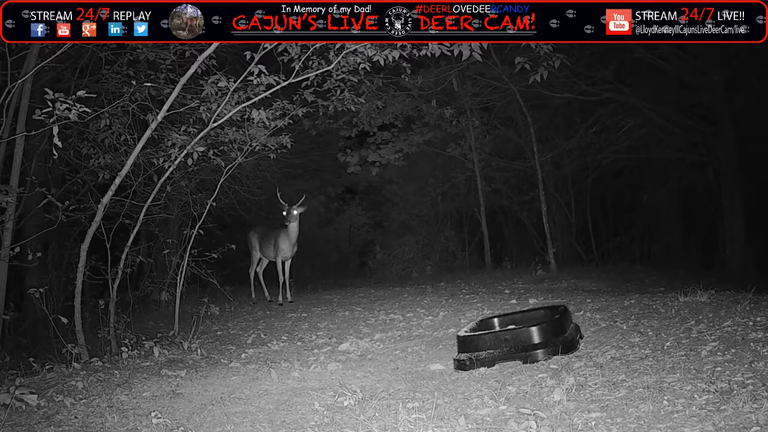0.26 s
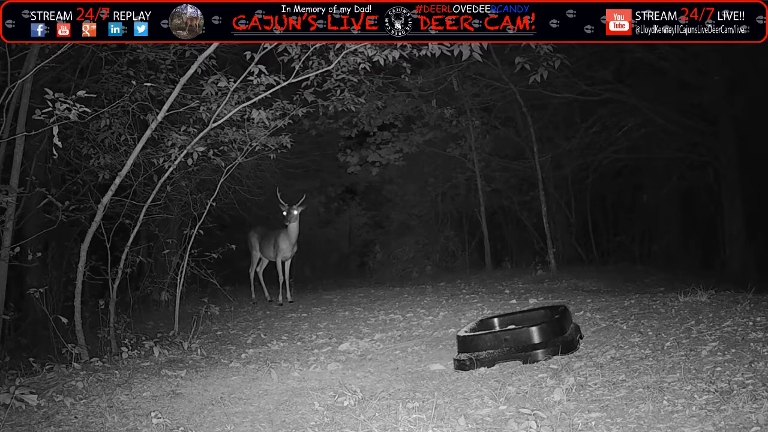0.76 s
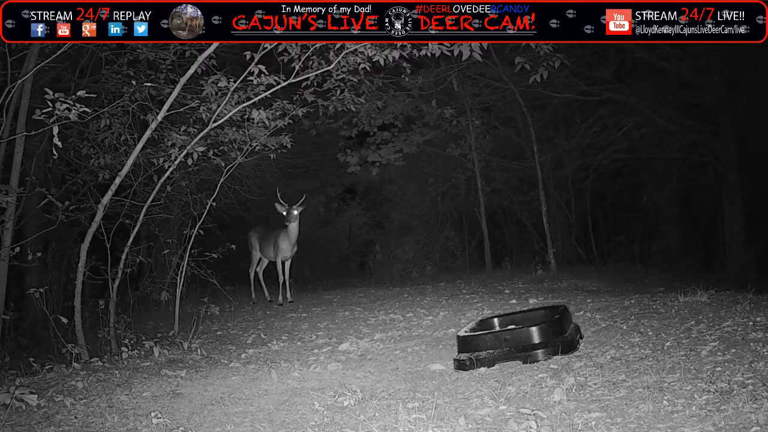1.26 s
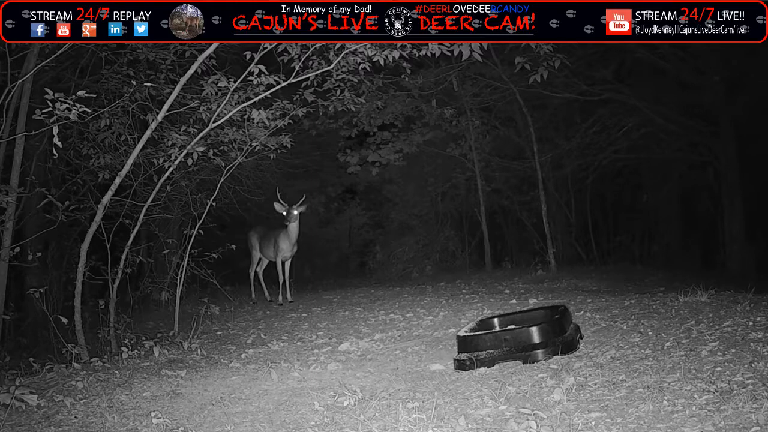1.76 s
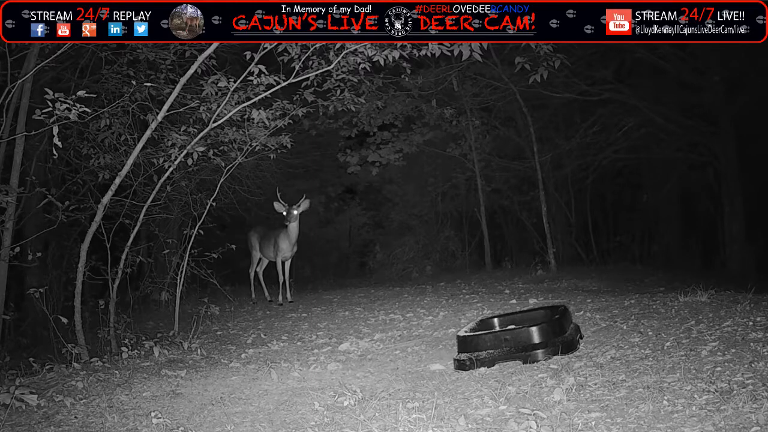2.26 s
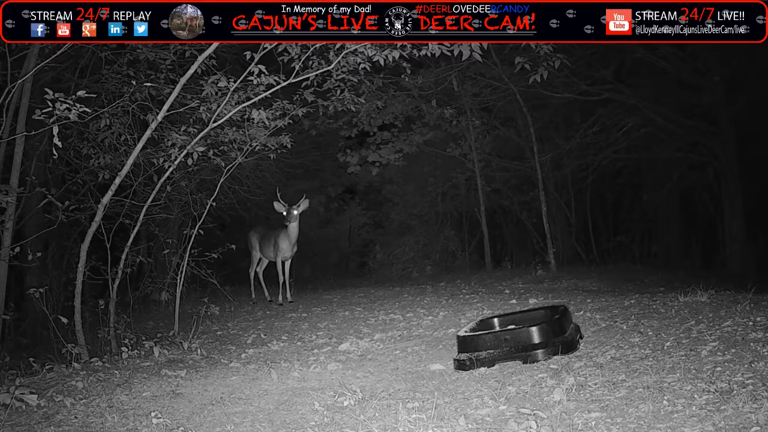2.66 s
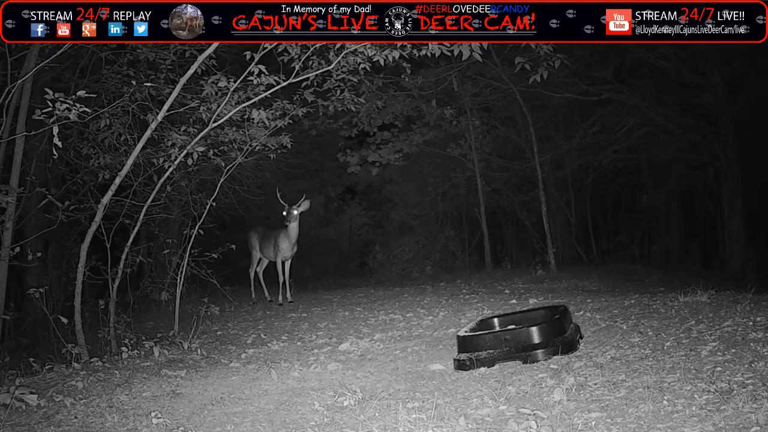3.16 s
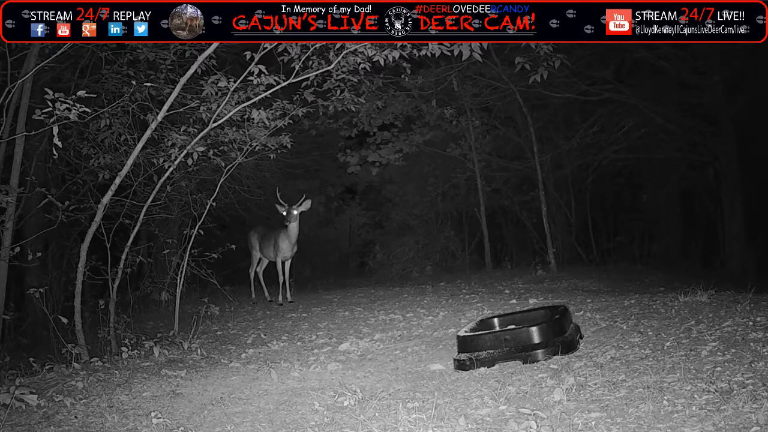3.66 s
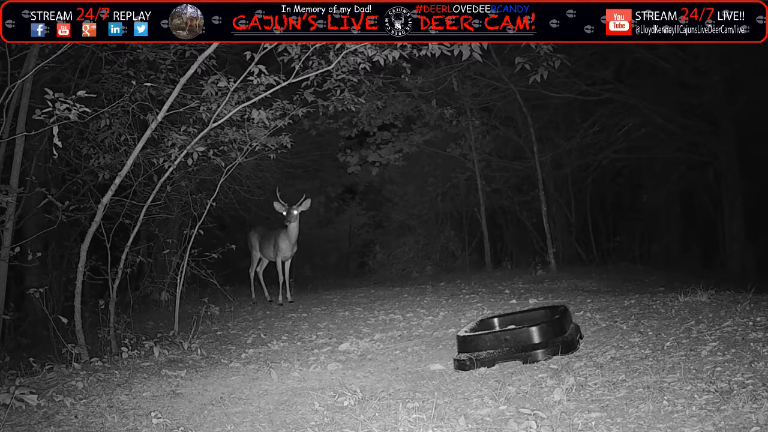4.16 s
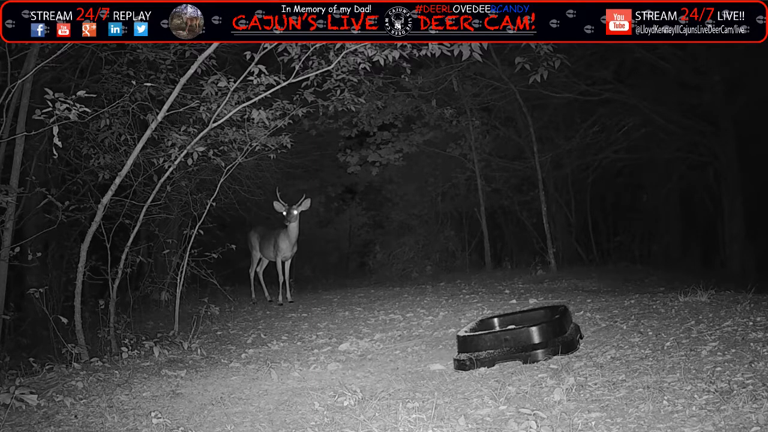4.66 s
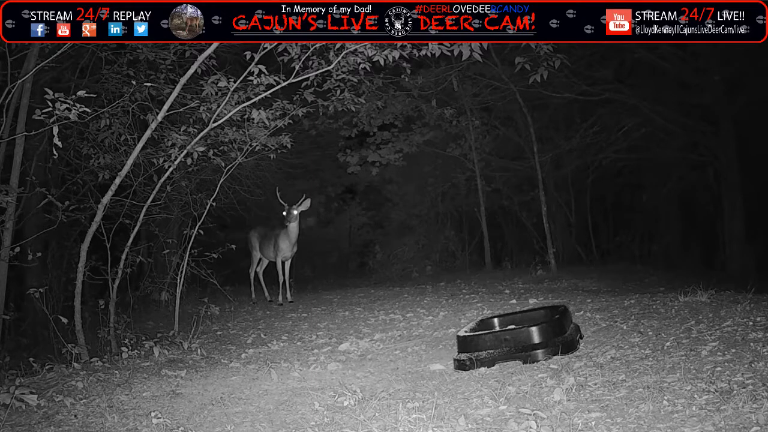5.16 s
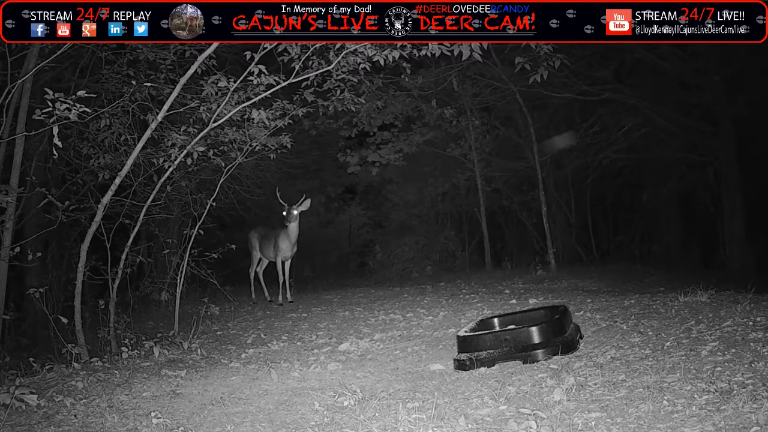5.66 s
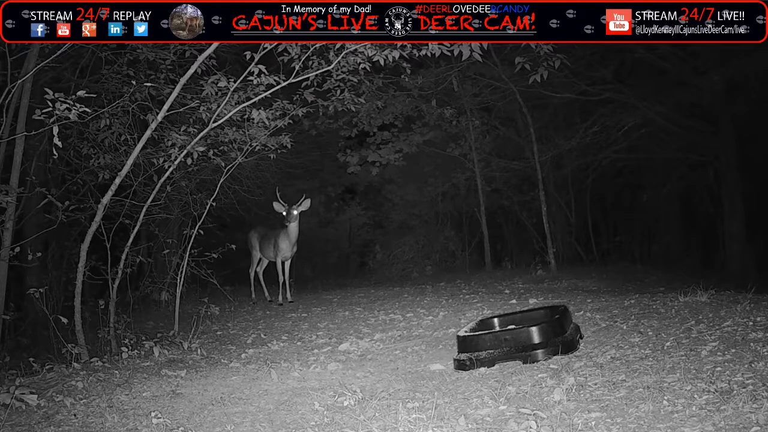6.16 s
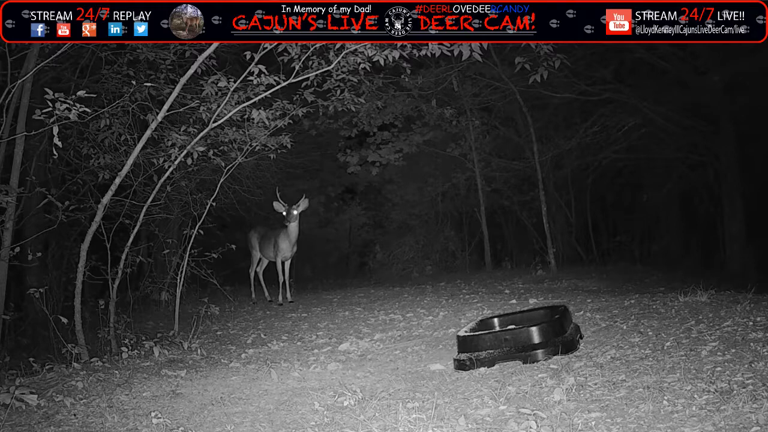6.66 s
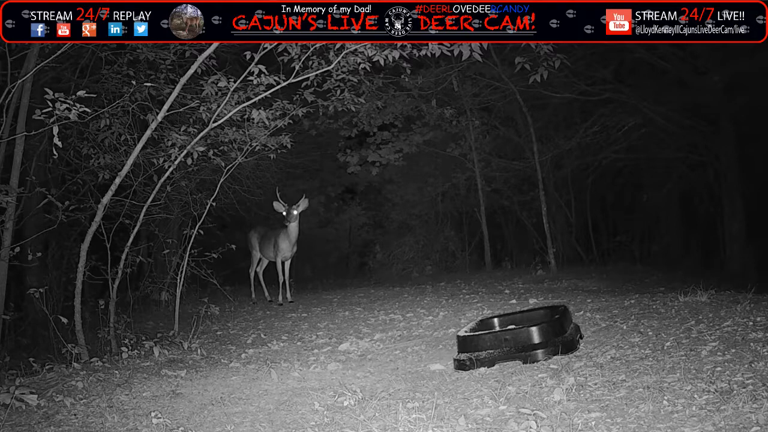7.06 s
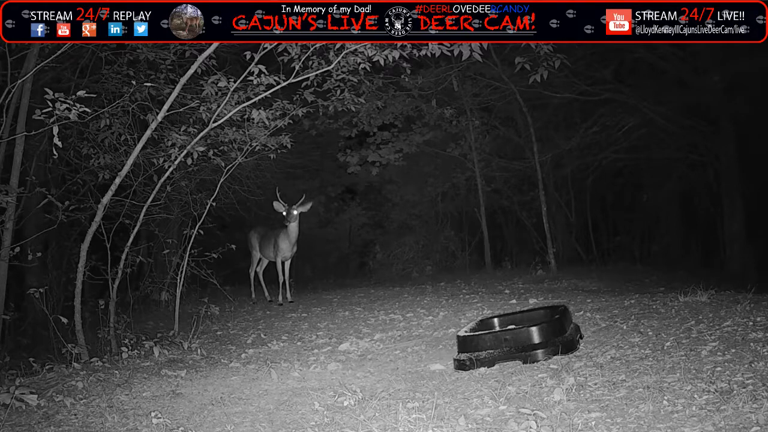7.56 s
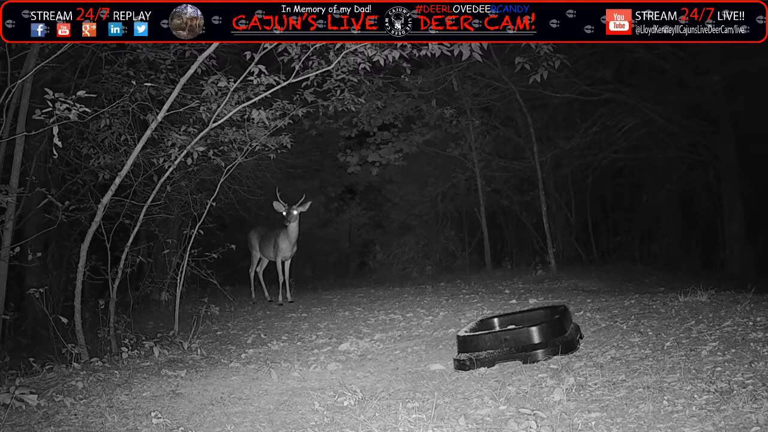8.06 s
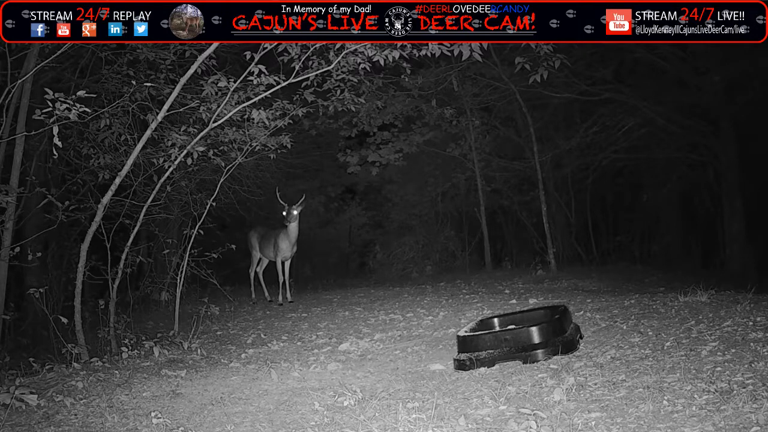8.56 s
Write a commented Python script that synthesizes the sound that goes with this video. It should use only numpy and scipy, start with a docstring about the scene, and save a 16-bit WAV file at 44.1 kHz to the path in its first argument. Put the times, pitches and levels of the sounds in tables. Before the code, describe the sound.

A night insect chorus at the edge of a wood runs unbroken for about nine seconds, heard through one fixed outdoor microphone. Tree crickets hold a mellow, continuous trill, while farther insects add a shrill, blurred layer, some pulsing gently about four times a second. Nearer crickets take turns with short, high trills, most under half a second, lightly echoed by the trees. One stands out right at the start, and others come through around 1, 2, 3.3 and 4 seconds. The near crickets pause from about 4.7 to 5.4 seconds, then trill in a busier, overlapping run until 7.3, with more from 7.5 to the end. Underneath, a deep distant rumble stays steady, slightly stronger at the opening. A faint, wavering low hum grows slowly, dipping briefly near 6.4 seconds. Soft hiss and a barely audible high whine continue throughout.

```python
"""Night at the edge of a wood.

Near crickets take turns with short trills over an unbroken chorus of tree crickets and shriller,
farther insects. Each wing stroke draws a scraper over a file; trunks and leaves scatter the tone.
Underneath: a distant rumble, a faint hum and whine, and hiss. One fixed outdoor microphone."""
import sys
import numpy as np
from scipy import signal
from scipy.fft import rfft, irfft
from scipy.io import wavfile

SR = 44100
rng = np.random.default_rng(int(sys.argv[2]) if len(sys.argv) > 2 else 0)


def file_out(sig):
    """Save sig as 16-bit WAV at sys.argv[1]."""
    # one column per channel
    cols = np.atleast_2d(sig).T
    # limit, then scale
    lim = np.clip(cols, -1, 1)
    pcm = np.round(lim * 32767).astype(np.int16)
    wavfile.write(sys.argv[1], SR, pcm)


N = 388961
TIME = np.arange(N) / SR


def from_db(db):
    return 10 ** (np.asarray(db) / 20)


def unit_rms(x):
    return x / np.sqrt(np.mean(x ** 2) + 1e-20)


def gain_curve(rows):
    """Per-sample gain from (time [s], level [dB]) rows."""
    time_s, level_db = np.transpose(rows)
    return from_db(np.interp(TIME, time_s, level_db))


def drift(rate_hz, size=N):
    """Random curve, spread about 1, with rate_hz breakpoints a second."""
    steps = np.arange(size) / SR * rate_hz
    return np.interp(steps, np.arange(1000), rng.standard_normal(1000))


def wander(spread_db, rate_hz):
    """Gain straying at random around 1."""
    return from_db(spread_db * drift(rate_hz))


def noise(spectrum):
    """Steady coloured noise, rms 1, silent beyond the ends of the spectrum."""
    hz, db = np.transpose(spectrum)
    bins_hz = np.maximum(np.fft.rfftfreq(N, 1 / SR), 1)
    colour = from_db(np.interp(np.log(bins_hz), np.log(hz), db, left=-np.inf, right=-np.inf))
    return unit_rms(irfft(rfft(rng.standard_normal(N)) * colour, N))


def wood_scatter(x, scatter_db, t60_s=.43):
    """Direct sound plus decaying echoes off trunks and leaves, at scatter_db re direct."""
    t = np.arange(SR // 4) / SR
    echoes = rng.standard_normal(len(t)) * from_db(-60 * t / t60_s)
    path = from_db(scatter_db) * echoes / np.linalg.norm(echoes)
    path[0] += 1
    return signal.oaconvolve(x.astype(np.float32), path.astype(np.float32))


def wing_strokes(size, pitch_hz, rate_hz, sag, duty, jitter):
    """Each closing stroke draws scraper over file: a short tone that sags as the wing slows."""
    strokes = rng.random() + np.cumsum(rate_hz * (1 + .02 * drift(4, size))) / SR
    index = strokes.astype(int)
    detune, strength, phase = rng.standard_normal((index[-1] + 1, 3)).T
    progress = np.minimum((strokes - index) / duty, 1)
    tone_hz = pitch_hz * (1 + sag * (.5 - progress) + jitter * detune[index])
    cycles = np.cumsum(tone_hz) / SR + phase[index]
    # peak force mid-stroke, none while the wings reopen
    force = np.sin(np.pi * progress) * (1 + .068 * strength[index])
    return force * np.sin(2 * np.pi * cycles)


# wings: cricket -> (pitch [Hz], sag per stroke [fraction of pitch])
CRICKET_WINGS = {"clear": (4715, .012), "hoarse": (4608, .024), "high": (4875, .014), "thin": (4842, .012),
                 "low": (4345, .022)}
# trills: (start [s], end [s], cricket, level [dB])
NEAR_TRILLS = [(-.1, 0.182, "clear", -32), (.4, .75, "high", -42.5), (0.416, 0.798, "clear", -40.5),
               (0.826, 1.147, "hoarse", -36.5), (.9, 1.15, "thin", -45), (1.4, 1.8, "clear", -42.5),
               (1.419, 1.75, "hoarse", -41.5), (2.034, 2.474, "clear", -36.5), (2.33, 2.7, "high", -42.5),
               (2.7, 3.1, "thin", -44.5), (3.24, 3.55, "clear", -35.5), (3.278, 3.588, "hoarse", -36),
               (3.282, 3.55, "low", -46), (3.823, 4.303, "clear", -35), (4.35, 4.698, "high", -42),
               (5.448, 5.7, "hoarse", -40), (5.551, 5.92, "clear", -40), (5.688, 5.92, "thin", -37.5),
               (6.047, 6.28, "clear", -35.5), (6.188, 6.523, "hoarse", -34), (6.298, 6.48, "clear", -37),
               (6.503, 7.25, "high", -44), (6.65, 6.9, "low", -50), (6.873, 7.2, "hoarse", -42),
               (6.974, 7.263, "clear", -38), (7.504, 7.77, "clear", -41), (7.499, 7.79, "hoarse", -40),
               (7.83, 8.15, "thin", -45), (8.123, 8.37, "clear", -35), (8.479, 8.9, "clear", -36.5),
               (8.665, 8.9, "hoarse", -35.5)]


def near_crickets(swell_s=.045, stop_s=.04):
    """Short trills that swell over the first strokes and die away among the trees."""
    out = np.zeros(N)
    for start_s, end_s, cricket, level_db in NEAR_TRILLS:
        pitch_hz, sag = CRICKET_WINGS[cricket]
        start_s, end_s = start_s - swell_s / 2, end_s + stop_s / 2
        first = max(int(start_s * SR), 0)
        t = np.arange(first, int(end_s * SR)) / SR
        effort = np.clip((t - start_s) / swell_s, 0, 1) * np.clip((end_s - t) / stop_s, 0, 1)
        strokes = wing_strokes(len(t), pitch_hz, rate_hz=43, sag=sag, duty=.8, jitter=.00195)
        trill = wood_scatter(effort * strokes, scatter_db=-4)
        gain = from_db(level_db) * np.sqrt(np.sum(effort ** 2) / np.sum(trill ** 2))
        out[first:first + len(trill)] += gain * trill[:N - first]
    return out


def chorus(pitch_hz, spread_hz, rate_hz, rate_spread, sag, duty, scatter_db, count):
    """Nonstop singers, each with its own pitch, tempo and echoes; outer pitches fainter; rms 1."""
    out, lead = np.zeros(N), SR // 4
    for offset in (2 * np.arange(count) + 1) / count - 1:
        singer_hz = pitch_hz + spread_hz * offset
        stroke_hz = rate_hz * (1 + rate_spread * rng.uniform(-1, 1))
        strokes = wing_strokes(N + lead, singer_hz, stroke_hz, sag, duty, jitter=.13 * sag)
        song = wood_scatter(strokes, scatter_db)[lead:lead + N]
        out += np.exp(-offset ** 2) * unit_rms(song)
    return unit_rms(out)


# effort of the low and high singers: (time [s], relative level [dB])
LOW_TREE_EFFORT = [(0.0, -42), (0.68, -47.5), (2.65, -43.5), (3.98, -48), (4.67, -44.5), (7.15, -46.5),
                   (8.67, -44.5), (8.82, -48)]
HIGH_TREE_EFFORT = [(0, -38.5), (3.1, -37.5), (3.5, -41), (3.95, -38.5), (8.82, -38.5)]


def tree_crickets():
    """Two mellow, continuous trills; the higher singers are nearer, and one stands out."""
    low = chorus(2330, 80, rate_hz=43, rate_spread=.06, sag=.085, duty=.7, scatter_db=3, count=3)
    high = chorus(2595, 170, rate_hz=41, rate_spread=.05, sag=.072, duty=.76, scatter_db=5, count=6)
    nearest = chorus(2700, 0, rate_hz=41, rate_spread=.005, sag=.065, duty=.66, scatter_db=0, count=1)
    return (gain_curve(LOW_TREE_EFFORT) * from_db(-.5) * low
            + gain_curve(HIGH_TREE_EFFORT) * (from_db(-1.43) * high + from_db(-6.5) * nearest))


# effort of the group chirping in step: (time [s], level [dB])
CHIRPER_EFFORT = [(0, -47.5), (5.2, -47.5), (7.15, -45), (8.82, -48.5)]


def chirp_gain(beat_hz=3.9, first_peak_s=.075, depth_db=1.3):
    """The group swells and sinks on a common, slightly ragged beat."""
    beat = np.cos(2 * np.pi * beat_hz * (TIME - first_peak_s))
    return gain_curve(CHIRPER_EFFORT) * from_db(depth_db * beat) * wander(spread_db=1, rate_hz=25)


# effort of the far crickets: (time [s], level [dB])
FAR_CRICKET_EFFORT = [(0, -40), (.3, -45), (1.3, -38), (3.1, -40.5), (5.1, -39), (5.95, -42), (7.2, -41.3),
                      (8.82, -40.5)]


def far_insects():
    """Crowds deeper in the wood, their strokes blurred by the trees."""
    chirpers = chorus(3630, 220, rate_hz=46, rate_spread=.06, sag=.14, duty=.5, scatter_db=3, count=5)
    faint = chorus(3200, 170, rate_hz=45, rate_spread=.08, sag=.13, duty=.6, scatter_db=5, count=2)
    crickets = chorus(4625, 140, rate_hz=43, rate_spread=.06, sag=.04, duty=.8, scatter_db=8.5, count=5)
    farthest = chorus(4660, 400, rate_hz=42, rate_spread=.088, sag=.14, duty=.8, scatter_db=8, count=6)
    shrill = chorus(5700, 380, rate_hz=68, rate_spread=.15, sag=.11, duty=.85, scatter_db=11, count=8)
    rasp = chorus(5600, 560, rate_hz=60, rate_spread=.2, sag=.18, duty=.85, scatter_db=15, count=3)
    thin = chorus(6660, 250, rate_hz=21, rate_spread=.12, sag=.13, duty=.75, scatter_db=8, count=3)
    shrill_gain = from_db(-38) * wander(spread_db=.2, rate_hz=1.57)
    return (chirp_gain() * chirpers
            + gain_curve(FAR_CRICKET_EFFORT) * crickets
            + shrill_gain * (from_db(-.34) * shrill + from_db(-9.5) * rasp)
            + from_db(-56.5) * faint + from_db(-44) * farthest + from_db(-52) * thin)


# rumble spectra: (frequency [Hz], relative density [dB])
DEEP_SPECTRUM = [(20, -32), (35, -22.5), (55, -14), (90, -4.5), (130, -1), (190, 0.5), (245, -1.5),
                 (280, -8), (320, -7.5), (390, -17.5), (600, -40)]
ROAR_SPECTRUM = [(200, -27), (380, -0.5), (560, -0.5), (700, -4.5), (850, -11.5), (1050, -16.5),
                 (1350, -17.5), (1800, -22.5), (2300, -21), (4000, -52)]
# rumble envelopes: (time [s], relative level [dB])
DEEP_ENVELOPE = [(0, -27), (2.1, -29.5), (3.6, -30), (5.4, -30.5), (6.4, -31), (7.95, -29), (8.5, -31.3)]
ROAR_ENVELOPE = [(0, -40), (1.1, -40.5), (2.7, -38.5), (4.8, -40.5), (6.3, -40), (8.82, -40.8)]


def distant_rumble():
    """Deep noise under a softer roar, each slowly varying in level."""
    deep = gain_curve(DEEP_ENVELOPE) * from_db(-.27) * noise(DEEP_SPECTRUM)
    roar = gain_curve(ROAR_ENVELOPE) * from_db(.58) * noise(ROAR_SPECTRUM)
    return deep + roar


# hum tones: (frequency [Hz], relative level [dB])
HUM_TONES = [(119, -38), (154.5, -37.5), (189, -42), (242, -45.5), (310, -53.5), (499, -54), (537, -56)]
# hum envelope: (time [s], gain [dB])
HUM_ENVELOPE = [(0, -5), (5.5, 2.2), (6.4, -0.5), (7.2, 3), (8.82, 2.5)]


def hum(waver_hz=1.08):
    """Low wavering tones that grow slowly, with one dip on the way."""
    out = np.zeros(N)
    for hz, level_db in HUM_TONES:
        gain = from_db(level_db) * (1 + .25 * drift(2.7))
        cycles = np.cumsum(hz + waver_hz * drift(5)) / SR
        out += gain * np.sin(2 * np.pi * cycles)
    return gain_curve(HUM_ENVELOPE) * out


# whine tones: (frequency [Hz], level [dB])
WHINE_TONES = [(8000, -77), (9001, -80), (15003, -79)]


def electrical_whine():
    """Faint, steady high tones."""
    return sum(from_db(db) * np.sin(2 * np.pi * hz * TIME) for hz, db in WHINE_TONES)


# wash spectrum: (frequency [Hz], relative density [dB])
WASH_SPECTRUM = [(1000, -4), (2200, 2.5), (3000, 10), (4100, 4), (5100, 11), (6500, 5.5), (7300, 4.5),
                 (7900, -0.5), (9500, -2), (10800, -4.5), (12100, -10), (13500, -5), (15000, -2.7),
                 (16000, -4)]


def insect_wash():
    """Countless far insects merged into even noise, with microphone hiss on top."""
    return from_db(-46.5) * noise(WASH_SPECTRUM)


def scene():
    """One microphone feeds both channels."""
    insects = near_crickets() + tree_crickets() + far_insects()
    night = insects + distant_rumble() + hum() + electrical_whine() + insect_wash()
    return np.stack([night, night])


def record(dry):
    """Short fade at each end, then a steep low-pass."""
    fade_s, cutoff_hz = .003, 15720
    fade = np.minimum(np.minimum(TIME, TIME[::-1]) / fade_s, 1)
    lowpass = signal.ellip(12, .1, 90, cutoff_hz, fs=SR, output="sos")
    return signal.sosfilt(lowpass, dry * fade)


dry = scene()
out = record(dry)
file_out(out)
```